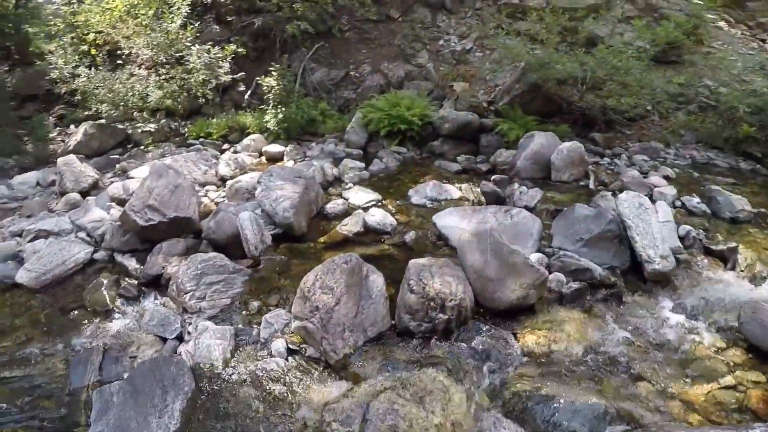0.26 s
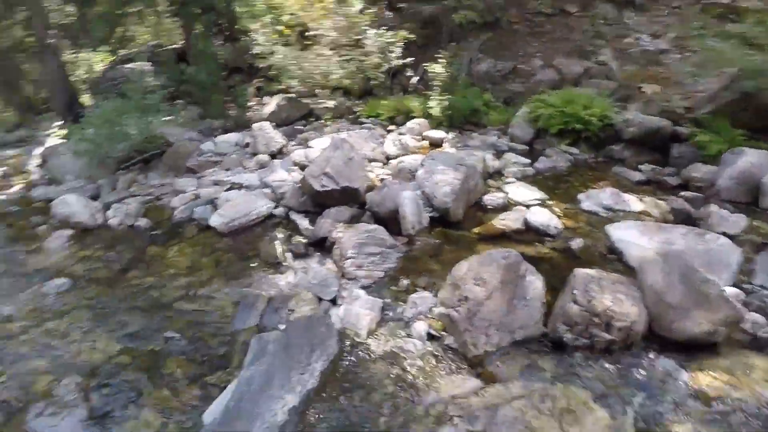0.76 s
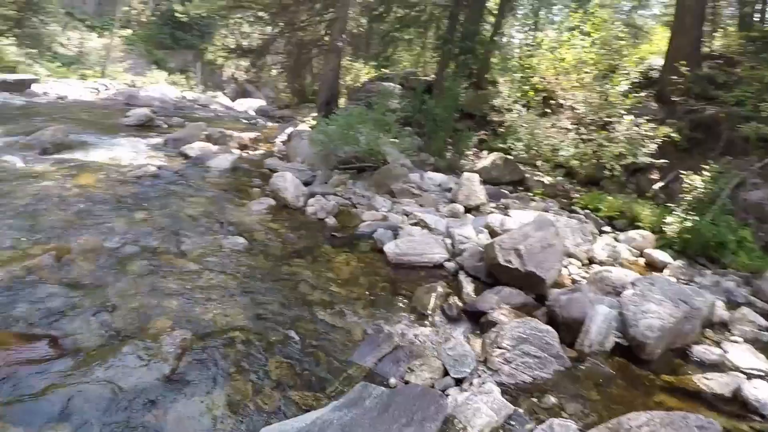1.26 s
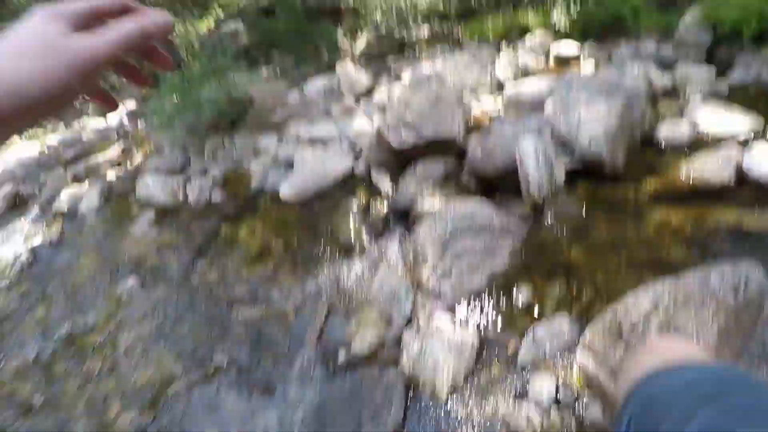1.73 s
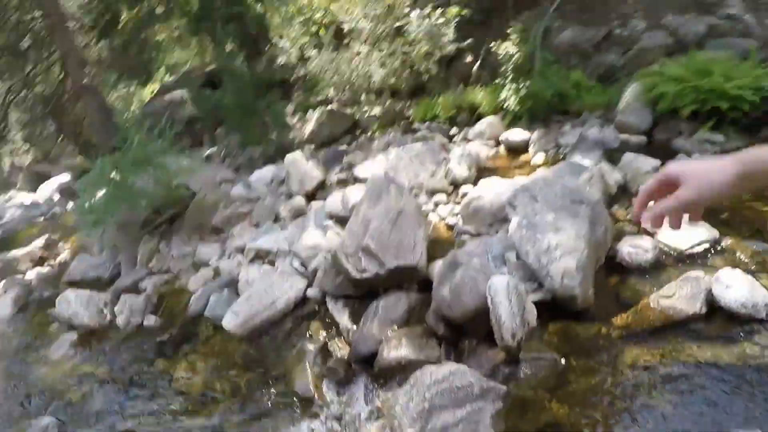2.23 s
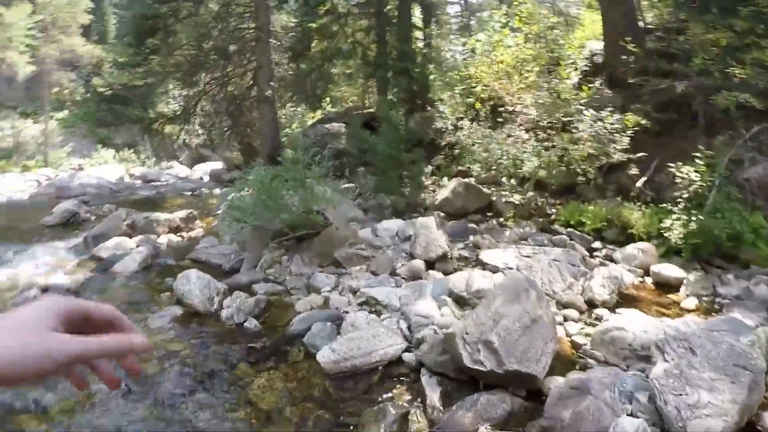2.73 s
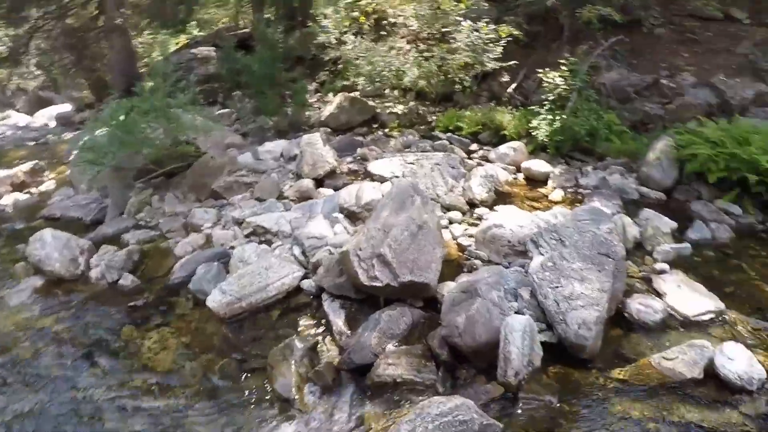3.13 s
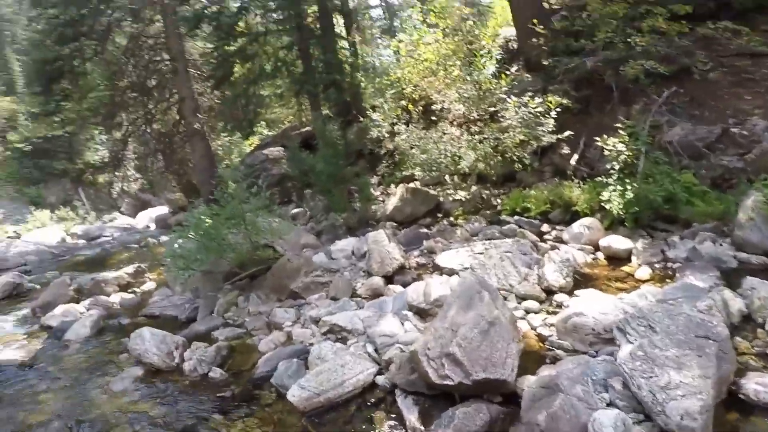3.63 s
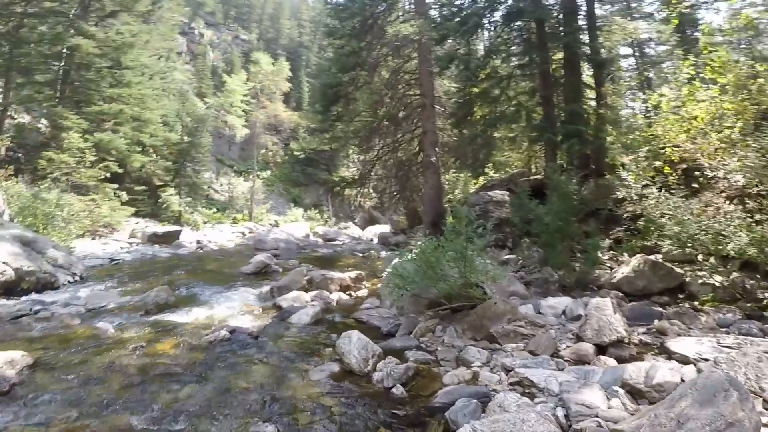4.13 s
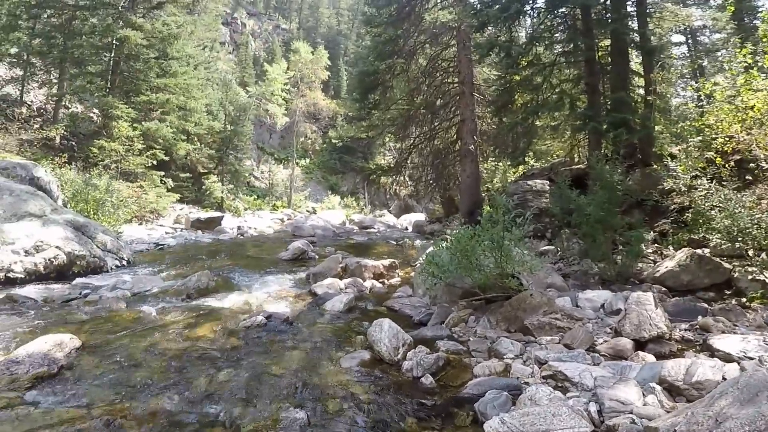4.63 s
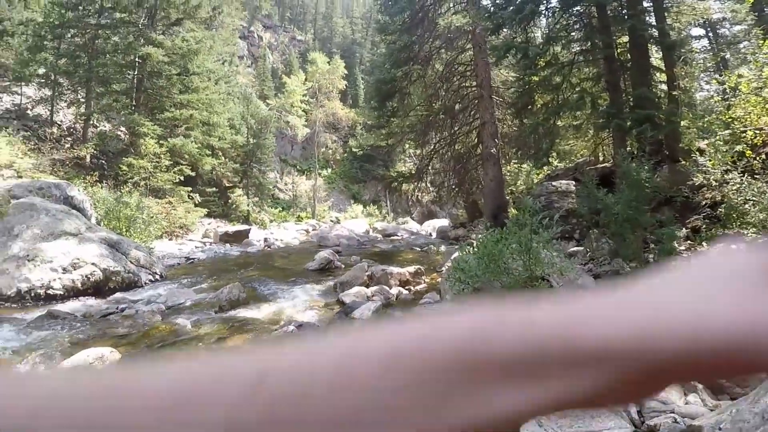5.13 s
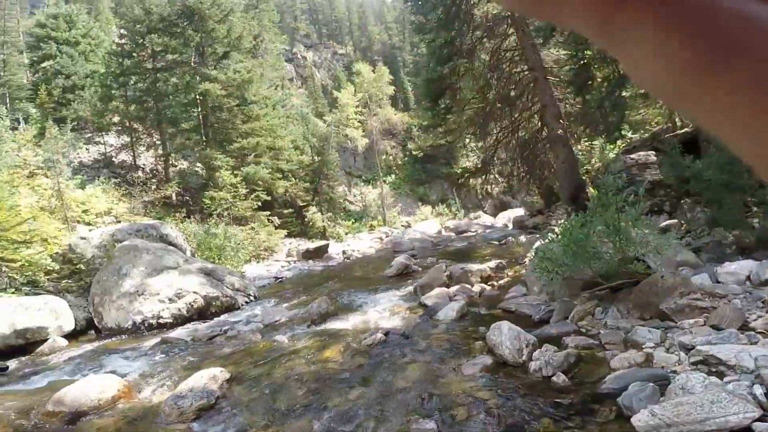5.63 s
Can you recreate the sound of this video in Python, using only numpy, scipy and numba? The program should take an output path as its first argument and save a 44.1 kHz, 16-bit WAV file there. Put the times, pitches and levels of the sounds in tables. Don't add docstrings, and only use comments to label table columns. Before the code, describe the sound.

Steady bubbling stream water outdoors, with low wind and body thumps, a ratcheting plastic creak, dry clicks and brief rubbing on the microphone.

```python
import sys
import numpy as np
from scipy import signal
from scipy.fft import rfft, irfft
from scipy.io import wavfile
from scipy.ndimage import uniform_filter1d
from numba import njit

SR = 44100
rng = np.random.default_rng(int(sys.argv[2]) if len(sys.argv) > 2 else 0)


def magnitude_from_level(level_db):
    exponent = np.asarray(level_db, float) / 20
    return 10 ** exponent


def dump_mix(stems):
    frames = np.atleast_2d(stems).T
    limited = np.clip(frames, -1, 1)
    pcm = np.round(limited * 32767).astype(np.int16)
    wavfile.write(sys.argv[1], SR, pcm)


N = 259037
T = np.arange(N) / SR

# time_s, level_db, treble_tilt_db_per_octave
CREEK_LEVELS = [(0.0, -43, .8), (.6, -43.5, 0.9), (1.24, -44, .5), (1.7, -40, -0.7), (1.9, -43.5, 1.2),
                (2.63, -46, 0.6), (3.2, -46, 1.5), (3.73, -45.5, 1), (4.6, -45, 1), (5.2, -45, 0.7),
                (5.46, -40.5, -1.5), (5.62, -44, 1.6), (5.87, -44, 0)]
# frequency_hz, density_db
WATER_SPECTRUM = [(71, -39), (120, -10.5), (436, -11.5), (937, -17), (1170, -11.5), (1490, -4),
                  (2270, -8.5), (2620, -5.5), (3270, -8.5), (3610, -9.5), (4990, -24), (7460, -32.5),
                  (14800, -35.5)]
# centre_hz, width_hz, lift_db
PORT_MODES = [(944, 320, 10), (1670, 70, 3), (2577, 215, 5), (3598, 107, 7), (5900, 1700, 5),
              (7290, 1160, 6.5), (10200, 890, 5.5)]
BASS_TILT_DB = 0.76

# start_s, peak_db, top_hz (each band runs from a quarter of this up to just
SPRAY_TICKS = [(0.3415, -36, 5900), (0.8086, -29, 5610), (1.631, -25, 5580), (1.8216, -20.5, 5600),
               (2.6958, -32, 6100), (3.4206, -29, 6000), (3.5404, -30, 6080), (3.6127, -39, 5710),
               (3.829, -35, 6690), (4.725, -42, 6150), (5.1394, -46, 5560)]
# peak_s, rise_s, fall_s, level_db, top_hiss_relative_db
BRUSHES = [
    (1.66, .04, .08, -53, -6),
    (1.77, .05, 0.046, -55, -5),
    (1.83, 0.023, 0.055, -49, -5),
    (5.39, 0.18, .3, -51, -20),
]

# mode_hz, t60_s, slip_level_db, drag_level_db
HOUSING_MODES = [(570, 0.04, -3, -1), (1082, 0.015, -1.5, 4), (1780, 0.0058, 1, -11),
                 (1841, 0.064, -11, -10), (190, 0.016, -9, -13.5), (417, 0.011, -6.5, -7),
                 (910, 0.0092, -15.5, -15), (1430, 0.0036, -10, -6), (2190, 0.0076, -8, -2),
                 (2720, 0.0087, -7.5, -38), (3210, 0.0086, -1.5, -4.5), (3840, 0.012, -14, -16),
                 (4520, 0.02, -15, -15), (5360, 0.011, -19.5, -27), (5820, 0.012, -25, -25),
                 (6400, 0.0051, -26, -49), (9400, 0.0017, -33, -28)]
RING_SHARE, RING_SPREAD_DB = 0.83, 3.5
# start_s, third_mode_db, first_relative_db, upper_relative_db, third_mode_hz
CLASP_SNAPS = [(1.225, -37, -20, -19, 1670), (1.807, -19.5, -27, -20, 1780), (1.8647, -19, -17, -18, 1780),
               (2.8407, -14.5, -14, -9.5, 1780), (2.883, -22, -3.5, -4.5, 1850),
               (2.9218, -25.5, -4, -4, 1950), (2.9546, -20.5, -2, -5, 1780), (3.4217, -22, -5, -15, 1866),
               (3.5395, -28, -7.5, -9, 1820), (3.988, -24.5, -5.5, -11, 1900),
               (4.008, -18.5, -10.5, -7.5, 1855), (5.267, -22, -18, -17, 1820),
               (5.5206, -25.5, -6, -16, 2080), (5.6012, -12.5, -20, -8, 1600)]
SNAP_SECOND_DB, LOOSE_SECOND_DB, LOOSE_FROM_S = -8.5, -0.5, 5.5
# start_s, third_mode_db, first_relative_db
MOUNT_CREAKS = [
    (1.5658, -33.5, 1),
    (1.6298, -26, 6),
    (1.6447, -27, 4),
    (1.6507, -25.5, 4.5),
    (1.6558, -21, -18),
    (1.671, -23.5, 4),
    (1.6981, -21, -2),
    (1.822, -33, 8),
]
CREAK_SECOND_DB, CREAK_UPPER_DB, CREAK_HZ = -5.5, -4.5, 1750
# start_s, first_mode_db, second_mode_db
WALL_TAPS = [(1.0324, -21, -39), (1.077, -42, -30), (1.7154, -26.5, -48), (1.7575, -34, -26),
             (1.8155, -18, -18.5), (2.1976, -33, -51), (2.3175, -34, -26.5), (2.9064, -28, -33),
             (3.3298, -53, -35), (5.3545, -38, -34), (5.3703, -34, -32), (5.3991, -36, -27.5),
             (5.4948, -13, -22.5)]
TAP_THIRD_DB, TAP_UPPER_DB, TAP_HZ = -19.5, -15, 1667
# start_s, third_mode_db
HINGE_RATCHET = [(1.2852, -20), (1.3327, -24.5), (1.3565, -26.5), (1.3847, -18.5), (1.393, -25),
                 (1.4035, -22.5), (1.414, -15.5), (1.4208, -19), (1.4352, -13), (1.444, -17), (1.4501, -19),
                 (1.4593, -20), (1.4686, -19), (1.4786, -15), (1.497, -29.5), (1.511, -40)]
RATCHET_HZ, TIGHT_S, EASES_S = 1842, 1.39, 1.441
RATCHET_FIRST_DB, RATCHET_SECOND_DB, TIGHT_FIRST_DB, TIGHT_SECOND_DB = -4, -1, -7.5, -7
RATCHET_UPPER_DB, DULLS_DB_PER_S = -4, -250
# peak_s, rise_s, fall_s, level_db, low_mode_db
STRAP_DRAG = [(1.38, 0.072, 0.17, -43.5, -2), (1.65, .03, 0.057, -38.5, -1), (1.715, 0.032, 0.049, -39, -4),
              (1.78, 0.055, .05, -38.5, -16), (1.84, 0.027, 0.067, -43, -18),
              (2.29, 0.022, 0.15, -50.5, 0.5), (2.61, 0.022, 0.081, -49.5, -4.5),
              (2.85, 0.015, 0.24, -48, -11), (3.42, 0.11, 0.068, -52.5, -5), (5.26, 0.14, 0.26, -47.5, -5),
              (5.385, 0.097, 0.13, -44.5, -11), (5.56, 0.076, 0.14, -47.5, 2)]
DRAG_EVEN_DB, DRAG_DULLS = -46.5, 0.48

# inward_swing_s, peak_db
PULSE_BEATS = [(0.584, -27.5), (0.898, -20), (1.252, -20), (1.61, -30), (1.976, -26), (2.657, -16.5),
               (3.014, -16.5), (3.373, -20), (3.727, -17.5), (4.084, -17), (4.447, -19), (4.806, -19.5),
               (5.168, -20), (5.573, -28.5)]
BEAT_HZ, BEAT_CYCLES, BEAT_DB = 46, 0.82, -2.5
SWING_S, SWING_DB, SWING_HZ, SWING_CYCLES = 0.014, -6, 50, 0.44
REBOUND_S, REBOUND_DB, REBOUND_HZ, REBOUND_CYCLES = 0.0442, -9.5, 25.5, 1.78
# inward_swing_s, peak_db, swing_hz, decay_cycles (to 1/e)
BODY_JOLTS = [(0.237, -25.5, 25.5, 1.24), (.545, -23.5, 24, 0.75), (1.074, -26, 20.6, 1.7),
              (1.498, -23.5, 34, 3), (1.57, -21.5, 60, 1.2), (1.651, -12.5, 21.7, 1.84),
              (1.726, -10, 22.2, 0.73), (1.853, -12.5, 21.2, 1.1), (1.911, -25, 20, 0.52),
              (2.199, -22, 98, 0.31), (2.286, -25, 32, 2.3), (2.326, -11.5, 74, 0.42),
              (2.362, -11, 19, 0.54), (2.435, -22.5, 16.6, 1.14), (2.871, -26.5, 106, 1.15),
              (3.66, -27.5, 22.1, 1.6), (4.042, -30, 41, 1.2)]
# swing_s, peak_db, swing_hz, decay_cycles (to 1/e)
OUTWARD_NODS = [
    (.205, -27, 35, 0.52),
    (.877, -29, 50, 0.9),
    (1.835, -8.5, 36, 0.57),
    (2.338, -7.5, 39.6, 0.4),
]
# peak_s, rise_s, fall_s, level_db, flutter_relative_db
WIND_GUSTS = [(0.01, .1, 0.14, -30, -35), (.6, 0.28, 0.22, -35, -27), (.95, 0.17, 0.27, -34, -20),
              (1.44, 0.18, 0.32, -28, -10.5), (1.72, 0.075, 0.23, -25.5, -4.5), (1.95, .07, .06, -44, 2.5),
              (2.1, 0.13, .15, -43, -23), (2.3, 0.066, 0.11, -46, -5), (2.47, 0.2, 0.081, -34.5, -20),
              (2.88, 0.08, 0.096, -31.5, -6.5), (3.01, .08, 0.069, -44.5, 3), (3.4, 0.32, 0.34, -33, -15),
              (3.86, 0.068, 0.097, -36.5, -25), (4.04, 0.15, 0.19, -34, -7.5), (4.38, 0.098, 0.11, -39, -9),
              (4.55, .1, 0.14, -38, -18), (4.9, 0.19, 0.32, -43.5, -31), (5.28, 0.14, 0.092, -31, -7),
              (5.38, 0.059, 0.073, -37.5, 0), (5.56, 0.17, .1, -36.5, 1.5),
              (1.04, 0.033, 0.036, -43.5, 4.5), (.58, 0.028, .04, -43, 4.5), (5.86, 0.2, .1, -37.5, -15.5)]
CALM_DB, CALM_FLUTTER_DB = -47.5, -76
EDGE_DB = -16.5

BEACON_S, BEACON_FIRST_S = .102404, .0485
WHINE_HZ, WHINE_DB = 12617.5, -85
# frequency_hz, density_db
HISS_SPECTRUM = [(18, -29), (30, -5), (180, -6.5), (394, -11), (497, -8.5), (881, -14), (1060, -3.5),
                 (2030, -2), (2630, 1), (15000, -34.5)]
HISS_DB = -62


def level(x, db):
    return x * magnitude_from_level(db) / np.sqrt(np.mean(x ** 2))


def band(x, lo_hz, hi_hz, order=2):
    return signal.sosfilt(signal.butter(order, [lo_hz, hi_hz], "band", fs=SR, output="sos"), x)


def ring(x, hz, t60):
    r, w = np.exp(-np.log(1000) / (t60 * SR)), 2 * np.pi * hz / SR
    return signal.lfilter([0, r * np.sin(w)], [1, -2 * r * np.cos(w), r * r], x)


def walk(rate):
    k = int(SR / rate)
    held = np.repeat(rng.standard_normal(N // k + 1), k)
    return 1.65 * uniform_filter1d(uniform_filter1d(held, k), k)[:N]


def swell_db(s, rise, fall, db):
    side_s = np.where(T < s, rise, fall)
    return np.maximum(db + EDGE_DB * ((T - s) / side_s) ** 2, -120)


def colour(x, points, modes, bands_db):
    f = np.fft.rfftfreq(N, 1 / SR) + 1
    hz, db = np.transpose(points)
    shape_db = np.interp(np.log(f), np.log(hz), db, left=-90)
    lift_db = sum(lift / (1 + (2 * (f - c) / w) ** 2) for c, w, lift in modes)
    spectrum = rfft(x) * magnitude_from_level(shape_db + lift_db)
    out = np.zeros(N)
    for c in 25 * 2 ** np.arange(0, 9.6, .5):
        share = np.clip(1 - np.abs(2 * np.log2(f / c)), 0, 1)
        out += magnitude_from_level(bands_db(c)) * irfft(spectrum * share, N)
    return out


@njit
def grains(start, hz, cycles, size, glide, n):
    out = np.zeros(n)
    for k in range(len(start)):
        w, a, p = 2 * np.pi * hz[k] / SR, size[k], 0.
        steps = cycles[k] * SR / hz[k]
        for i in range(start[k], min(n, start[k] + int(5 * steps))):
            p += w
            out[i] += a * np.sin(p)
            a *= 1 - 1 / steps
            w *= 1 + glide / steps
    return out


def creek():
    s, *columns = np.transpose(CREEK_LEVELS)
    near_db, tilt_db = [np.interp(T, s, c, left=-120, right=-120) for c in columns]
    when, pitch, length, rarity = rng.random((30000, 4)).T
    hz = 500 * 24 ** pitch
    size = np.sqrt(hz) * magnitude_from_level(-1.5 * np.log(rarity + 0.001))
    bubbles = grains((when * N).astype(np.int64), hz, 3 + 2.1 * length, size, 0.027, N)
    when, pitch, length, rarity = rng.random((2500, 4)).T
    hz = 4000 * 3.46 ** pitch
    size = np.sqrt(hz) * magnitude_from_level(-2.5 * np.log(rarity + 3e-3))
    splash = grains((when * N).astype(np.int64), hz, 3 + 20.0 * length, size, 0.025, N)
    water = rng.standard_normal(N) + level(bubbles, -5.0) + level(splash, -6.5)
    surge = .45 * walk(3)

    def flow_db(c):
        gurgle = (0.72 + c / 20000) * walk(12 + c / 400)
        treble = tilt_db * max(np.log2(c / 2500), 0)
        return surge + gurgle + treble + BASS_TILT_DB * max(np.log2(1800 / c), 0)

    out = colour(water, WATER_SPECTRUM, PORT_MODES, flow_db)
    return out * magnitude_from_level(near_db) / np.std(band(out, 950, 5400))


def spray_ticks():
    out, t = np.zeros(N), T[:600]
    for s, db, hz in SPRAY_TICKS:
        noise = rng.standard_normal(600) * np.exp(-t / 0.0013)
        click = band(noise, hz / 4.0, min(hz * 1.06, 15000))
        i = int(s * SR)
        out[i:i + 600] += click / np.abs(click).max() * magnitude_from_level(db - 5.0)
    return out


def brush():
    noise = rng.standard_normal(N) * magnitude_from_level(2.2 * walk(40))
    swish = level(band(noise, 1300, 6000), 0)
    top = level(band(noise, 9500, 22000), 0)
    return sum(magnitude_from_level(swell_db(*row[:4])) * (swish + magnitude_from_level(row[4]) * top) for row in BRUSHES)


def slips():
    rows = []
    for s, db, first_db, upper_db, hz in CLASP_SNAPS:
        second_db = SNAP_SECOND_DB if s < LOOSE_FROM_S else LOOSE_SECOND_DB
        rows.append((s, db, first_db, second_db, upper_db, hz))
    for s, db, first_db in MOUNT_CREAKS:
        rows.append((s, db, first_db, CREAK_SECOND_DB, CREAK_UPPER_DB, CREAK_HZ))
    for s, first_db, second_db in WALL_TAPS:
        db = max(first_db, second_db) + TAP_THIRD_DB
        rows.append((s, db, first_db - db, second_db - db, TAP_UPPER_DB, TAP_HZ))
    for s, db in HINGE_RATCHET:
        loose, tight = (RATCHET_FIRST_DB, RATCHET_SECOND_DB), (TIGHT_FIRST_DB, TIGHT_SECOND_DB)
        low_db = loose if s < TIGHT_S else tight
        upper_db = RATCHET_UPPER_DB + DULLS_DB_PER_S * max(s - EASES_S, 0)
        rows.append((s, db, *low_db, upper_db, RATCHET_HZ))
    return rows


def mount_slips():
    out, t = np.zeros(N + 6000), T[:6000]
    snap = band(np.exp(-((t - .0008) / .00004) ** 2), 930, 4900)
    snap = snap / np.abs(snap).max()
    for s, db, first_db, second_db, upper_db, third_hz in slips():
        detune, phase, late = rng.standard_normal((3, len(HOUSING_MODES)))
        i = int(s * SR)
        out[i:i + 6000] += np.sign(late[0]) * snap * magnitude_from_level(db + 0.44 * upper_db - 7.5)
        for k, (hz, t60, slip_db, _) in enumerate(HOUSING_MODES):
            hz = third_hz * hz / 1800 if k in (2, 3) else hz * (1 + .035 * detune[k])
            span = .0004 * magnitude_from_level(2.5 * late[k])
            push = (t / span) ** 2 * np.exp(-t / span) * np.cos(2 * np.pi * hz * t + 3 * phase[k])
            tone = ring(push, hz, t60 * RING_SHARE * magnitude_from_level(RING_SPREAD_DB * detune[-k]))
            rel_db = first_db if hz < 750 else second_db if k == 1 else upper_db if hz > 2500 else 0
            out[i:i + 6000] += tone / np.abs(tone).max() * magnitude_from_level(db + rel_db + slip_db + 0.5)
    return out[:N]


def strap_drag():
    sizes_db = 2.5 * np.minimum(rng.exponential(size=N), 4)
    hail = rng.standard_normal(N) * magnitude_from_level(sizes_db) * (rng.random(N) < .05) * magnitude_from_level(2.2 * walk(90))
    spans = []
    for *swell, low_db in STRAP_DRAG:
        db = swell_db(*swell)
        spans.append((db, low_db, np.clip(DRAG_DULLS * (DRAG_EVEN_DB - db), -6, 3)))
    out = np.zeros(N)
    for k, (hz, t60, _, drag_db) in enumerate(HOUSING_MODES):
        gain = np.zeros(N)
        for db, low_db, bright in spans:
            tilt_db = bright * np.log2(hz / 1060) * (db > -100) if k else low_db
            gain += magnitude_from_level(db + tilt_db)
        rubbed = band(ring(hail, hz, 0.65 * min(t60, .04)), hz / 1.88, hz * 1.63, order=1)
        out += level(rubbed, drag_db) * gain
    return out


def thumps():
    swings = [(-1, row) for row in BODY_JOLTS] + [(1, row) for row in OUTWARD_NODS]
    for s, db in PULSE_BEATS:
        swings.append((-1, (s, db + BEAT_DB, BEAT_HZ, BEAT_CYCLES)))
        swings.append((1, (s + SWING_S, db + SWING_DB, SWING_HZ, SWING_CYCLES)))
        swings.append((-1, (s + REBOUND_S, db + REBOUND_DB, REBOUND_HZ, REBOUND_CYCLES)))
    out = np.zeros(N)
    t = T[:12000] - 3000 / SR
    edge = 0.093 * np.cos(2 * np.pi * 110 * t) * np.exp(-(t / 0.01) ** 2)
    for way, (s, db, hz, cycles) in swings:
        i = int(s * SR)
        rise = np.exp(-(t * hz / (0.53 * cycles)) ** 2)
        envelope = np.where(t < 0, rise, np.exp(-np.abs(t) * hz / cycles))
        out[i - 3000:i + 9000] += way * magnitude_from_level(db + 1.5) * (np.cos(2 * np.pi * hz * t) * envelope + edge)
    return out


def gusts():
    deep = level(band(rng.standard_normal(N), 14, 42.3), -2.5)
    flutter = rng.standard_normal(N) * magnitude_from_level(3 * walk(30))
    upper = level(band(flutter, 70, 146, order=3), 0.66)
    deep_gain, upper_gain = magnitude_from_level(CALM_DB), magnitude_from_level(CALM_FLUTTER_DB)
    for *swell, flutter_db in WIND_GUSTS:
        gust = magnitude_from_level(swell_db(*swell))
        deep_gain = deep_gain + gust
        upper_gain = upper_gain + gust * magnitude_from_level(flutter_db)
    return deep_gain * deep + upper_gain * upper


def electronics():
    bursts = np.zeros(N)
    at = (np.arange(BEACON_FIRST_S, N / SR, BEACON_S) * SR).astype(int)
    bursts[at] = magnitude_from_level(.5 * rng.standard_normal(len(at)))
    t = T[:2000]
    sag = np.clip(t / 0.0015, 0, 1) * np.exp(-np.clip(t - .0015, 0, 1) / 0.0025)
    dips = np.convolve(bursts, sag)[:N]
    dips = signal.sosfilt(signal.butter(2, 30, "high", fs=SR, output="sos"), dips)
    dips = signal.sosfilt(signal.butter(2, 600, fs=SR, output="sos"), dips)
    whine = magnitude_from_level(WHINE_DB + 1.9 * walk(1.1)) * np.sin(2 * np.pi * WHINE_HZ * T)
    return whine - magnitude_from_level(-26.5) * dips


def channel_hiss():
    patches = walk(20)
    noise = rng.standard_normal(N)
    hiss = colour(noise, HISS_SPECTRUM, [], lambda c: 5.9 * patches + 6.65 * walk(25.146))
    return level(hiss, HISS_DB)


def scene():
    water = creek() + spray_ticks()
    handling = brush() + mount_slips() + strap_drag()
    mono = water + handling + thumps() + gusts() + electronics()
    side = channel_hiss()
    return np.array([mono + side, mono - side])


def roll_off(x):
    return signal.sosfilt(signal.butter(12, 15650, fs=SR, output="sos"), x)


def record(dry):
    limited = np.tanh(1.101 * dry) / 1.083
    top_cut = signal.ellip(8, .2, 70, 14900, fs=SR, output="sos")
    return roll_off(signal.sosfilt(top_cut, limited))


dry = scene()
out = record(dry)
dump_mix(out)
```